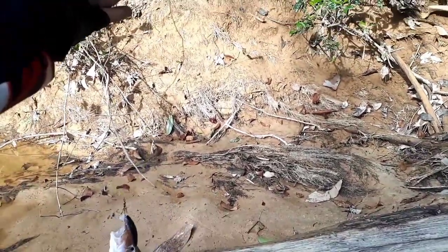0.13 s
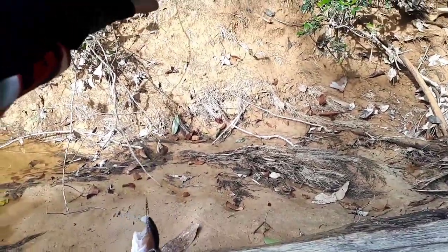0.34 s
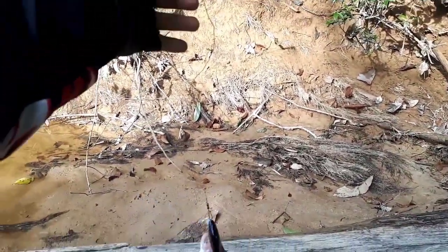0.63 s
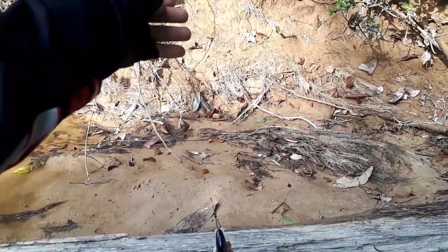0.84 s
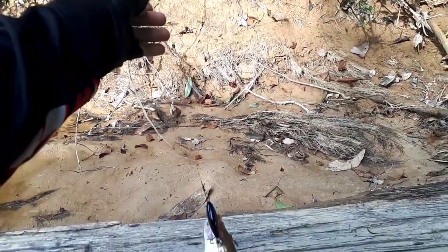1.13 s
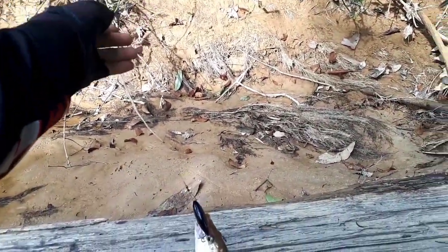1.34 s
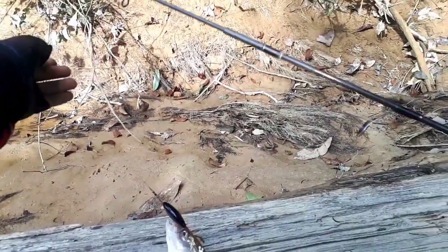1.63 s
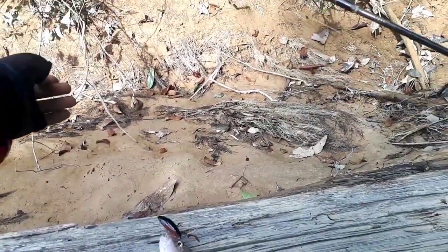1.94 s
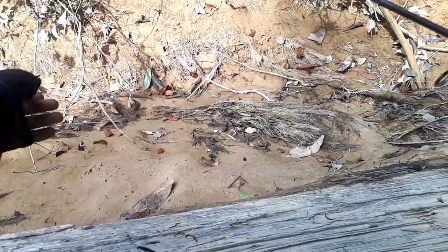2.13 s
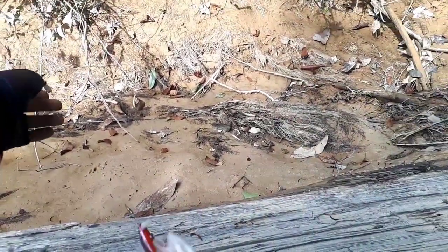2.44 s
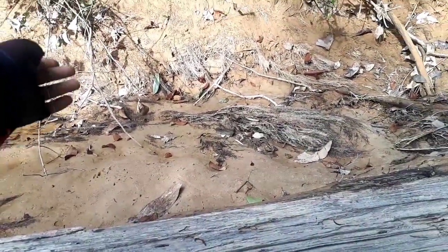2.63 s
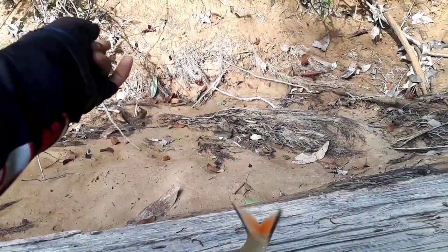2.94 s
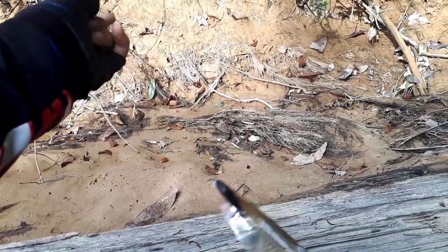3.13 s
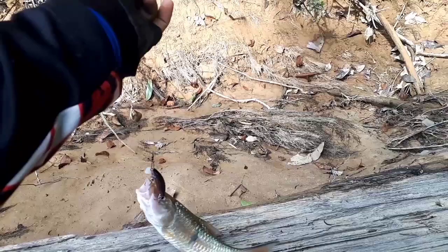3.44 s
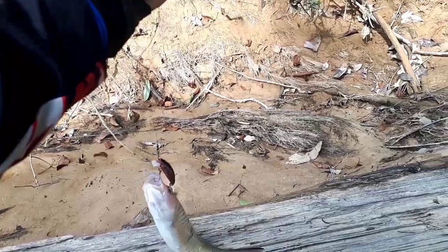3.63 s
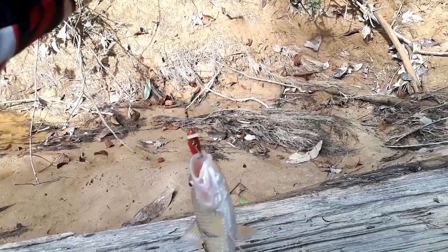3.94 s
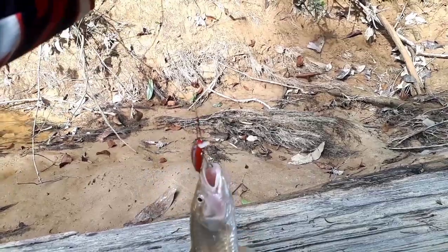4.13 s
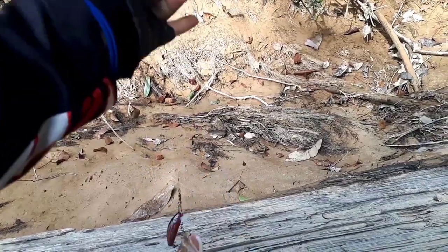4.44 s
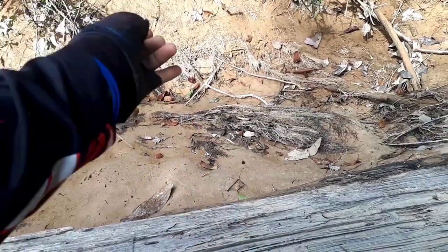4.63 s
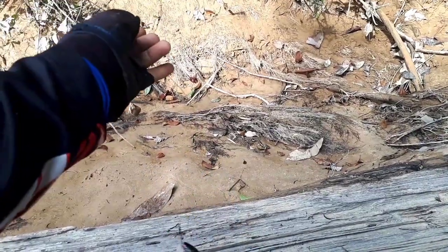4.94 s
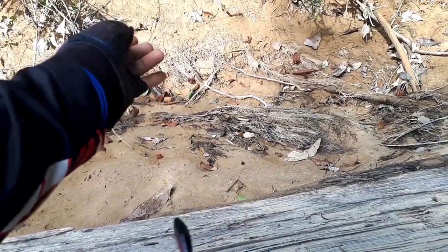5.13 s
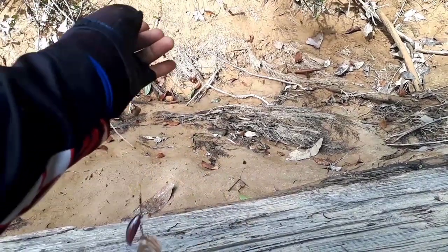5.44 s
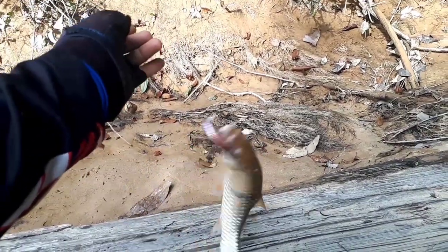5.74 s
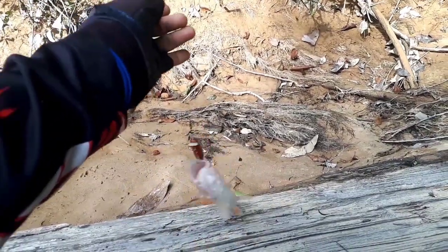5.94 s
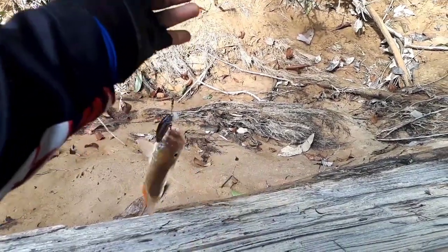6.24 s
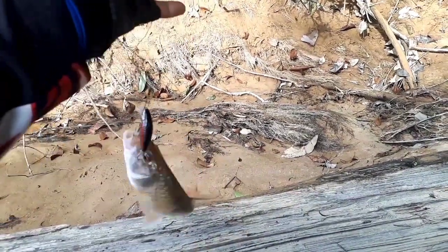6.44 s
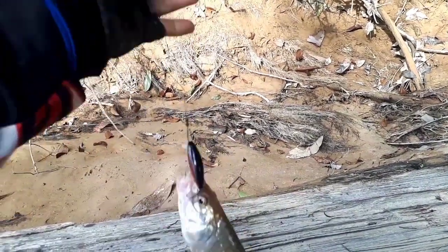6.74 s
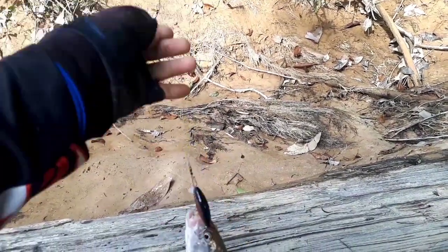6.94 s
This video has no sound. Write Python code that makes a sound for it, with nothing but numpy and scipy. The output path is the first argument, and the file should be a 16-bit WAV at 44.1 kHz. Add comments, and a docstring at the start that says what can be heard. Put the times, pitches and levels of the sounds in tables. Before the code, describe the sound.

Outdoors on a riverbank, a far cicada chorus holds a thin, high, slightly throbbing buzz over faint leaf and river hiss. At 0.1 s a tight group of wet smacks lands close, slightly right, followed by gritty rubbing. From 0.35 to 1.1 s soft low wind bumps hit the left side while twigs moan in airy, wavering tones. One crisp slap comes at 2.0, then juddering rubs, lure ticks and strong wind thumps from 2.25. A dense flurry at 2.45-2.57 mixes wet slaps, bright hook rattle and hollow log knocks; a sharp smack follows at 3.0 and clicking hits at 3.4. Wind bumps again near 3.8. Flurries return at 4.7 and, with heavier wood thuds, at 5.15-5.3. A last run spans 5.65-5.8, one weak slap and tick fall at 6.0, then faint rustling, a lone tick at 6.85 and a barely audible final wind bump at 7.0.

```python
"""A hooked fish thrashes on a dry log by a river, close by, while cicadas, leaves and river hiss in noise bands.
The first slaps come at 0.1 s: noise bursts ring as wet smack, hook tick and log thud, with rasping grains.
Gusts then thump the left port with low noise bumps, and twigs moan in broad bands and wavering tones.
Slap flurries follow near 2.5, 3.4, 4.7 and 5.2 s, with drops, lone lure rattles and juddering rubs between.
A last flurry near 5.7 s thins to one slap at 6 s, then a rustle, a lone tick and a faint final eddy at 7 s."""
import sys
import numpy as np
from scipy import signal
from scipy.io import wavfile
from scipy.ndimage import uniform_filter1d

SR = 44100
rng = np.random.default_rng(int(sys.argv[2]) if len(sys.argv) > 2 else 0)


def persist_wave(psi):
    """Save psi, clipped to +-1, as 16-bit WAV."""
    counts = np.round(np.clip(psi, -1, 1) * 32767).astype(np.int16)
    wavfile.write(sys.argv[1], SR, np.atleast_2d(counts).T)


N = 311787
T = np.arange(N) / SR
# Source levels hold before panning and before the final low and high cuts; stereo rows are left, right.


def amp(db):
    """Level in dB to linear gain."""
    return 10 ** (np.asarray(db) / 20)


def rms(x):
    """Root-mean-square level over all samples and ports."""
    return np.sqrt(np.mean(x ** 2))


def unit(x):
    """Scale to an RMS of 1."""
    return x / rms(x)


def pan(db):
    """Port gains whose left-to-right difference is db; negative leans right."""
    return amp(np.array([[db], [-db]]) / 2)


def band(x, hz, width_hz):
    """Two-pole resonance, gain 1 at the centre."""
    b, a = signal.iirpeak(min(hz, .45 * SR), hz / width_hz, fs=SR)
    return signal.lfilter(b, a, x)


def double_band(x, hz, width_hz):
    """The same resonance twice, for steeper skirts."""
    return band(band(x, hz, width_hz), hz, width_hz)


def rings(x, modes, twice=False):
    """Sum of resonances, each at its own level; a second, wider pass darkens the valleys."""
    out = 0
    for hz, width_hz, db in modes:
        mode = band(x, hz, width_hz)
        if twice:
            mode = band(mode, hz, 2 * width_hz)
        out = out + amp(db) * unit(mode)
    return out


def curve(rows, column):
    """One column of a table, interpolated to a value per sample."""
    rows = np.array(rows)
    return np.interp(T, rows[:, 0], rows[:, column])


def walk(rate):
    """Random levels held 1 / rate s and slewed twice, with an RMS of 1."""
    hold = int(SR / rate)
    steps = np.repeat(rng.standard_normal(N // hold + 1), hold)
    return unit(uniform_filter1d(uniform_filter1d(steps, hold), hold)[:N])


def pair(length, likeness):
    """White noise at two ports with the given correlation."""
    c = np.clip(likeness, 0, 1)
    mid, side = rng.standard_normal((2, length))
    return np.sqrt((1 + c) / 2) * mid + np.sqrt((1 - c) / 2) * side * np.array([[1], [-1]])


def trail(rows, decay_s):
    """Envelope of (time [s], level [dB]) events: powers add, each amplitude falls to 1/e in decay_s."""
    power = np.zeros(N)
    for s, db in rows:
        power[int(s * SR)] += amp(2 * db)
    return np.sqrt(signal.lfilter([1], [1, -np.exp(-2 / (decay_s * SR))], power))


SLAP_SAMPLES = 2048
MAX_LEFT_LEAD = 6  # samples the left port may hear a contact first; each contact lies at its own angle
SLAP_PAN_DB, THUD_PAN_DB = -2.5, -4
THUD_LAG_S = 0.003053  # the log answers a little after the smack
TICK_MS, TICK_HZ = 2.2, 7300  # contact time scale and smack pitch of a lone rattle
TICK_BODY_DB, TICK_LOG_DB = -10.5, -38.5  # its smack and thud, against its tick
# Slaps on the log: (time [s], smack level [dB], smack pitch [Hz], log thud level [dB],
# lure tick level [dB], contact time scale [ms])
SLAPS = [(0.1151, -34, 3230, -60, -45, 4.2), (0.1204, -38.5, 1180, -70, -49, 2.7),
         (0.1232, -30.5, 3640, -62, -35, 1.6), (0.1236, -38, 1070, -65, -58, 1.12),
         (0.164, -48.5, 2200, -77, -69, 4.6), (0.221, -54, 2600, -84, -58, 8.6),
         (2.0102, -35.5, 5200, -57, -33.5, 1.5), (2.452, -38, 3930, -50, -45, 3.4),
         (2.4613, -32.5, 4800, -56, -30.5, 2.9), (2.468, -35.5, 940, -43, -34, 2.44),
         (2.473, -30.5, 2600, -37.5, -26, 1.23), (2.4815, -24.5, 4900, -38.5, -30, 3.56),
         (2.4894, -41, 2440, -45, -29, 3.2), (2.499, -34.5, 3030, -46, -36.5, 2.6),
         (2.5304, -38, 4770, -62, -43, 1.4), (2.5348, -45, 3800, -61, -50, 1.5),
         (2.547, -49, 4000, -54, -56, 2.7), (2.5686, -38.5, 3880, -53.5, -58, 3.1),
         (2.989, -24, 4400, -40, -28.5, 2.18), (2.9914, -33.5, 1540, -63, -48, 1.17),
         (2.995, -46.5, 690, -63, -60, 10.6), (3.03, -60, 3700, -68, -69, 12),
         (3.4, -38, 4020, -61, -46, 1.7), (3.407, -57, 1550, -48, -50, 5.1),
         (3.4102, -29.5, 4000, -52, -24.5, 1), (3.4167, -48, 4000, -68, -43, 2.6),
         (4.6744, -48, 3720, -59, -51, 14.5), (4.6901, -33, 2110, -48, -30.5, 1.6),
         (4.6999, -36, 3930, -45, -41, 2.75), (4.706, -33, 2240, -48, -39, 4.8),
         (4.7159, -31.5, 4970, -53, -36, 2.15), (4.719, -29, 3350, -42, -27, 1.63),
         (4.7219, -41.5, 1870, -43, -30, 1.74), (5.141, -47.5, 4000, -47.5, -45, 4.8),
         (5.1495, -43.5, 1750, -41.5, -31, 1.64), (5.155, -36, 5070, -35, -33, 3.2),
         (5.187, -36, 730, -45, -38, 1.65), (5.19, -36, 2780, -43.5, -32, 1.35),
         (5.1988, -40, 4600, -45, -36, 3.4), (5.212, -48.5, 696, -51, -50, 3),
         (5.2882, -46.5, 1090, -52.5, -54, 3.04), (5.455, -62.5, 2570, -62, -51, 1.95),
         (5.6518, -47, 1490, -60, -38.5, 2), (5.656, -43.5, 4000, -68, -52, 3.6),
         (5.665, -45, 1180, -45, -57, 3.2), (5.6709, -39, 2540, -46, -37, 0.79),
         (5.68, -40.5, 4500, -51, -48, 2.4), (5.692, -43, 1180, -69, -47, 6.4),
         (5.7019, -34.5, 4660, -61, -38, 1.9), (5.7024, -40.5, 1600, -36, -46, 2.5),
         (5.7152, -36.5, 4670, -46, -44, 3), (5.7205, -32.5, 4550, -44, -31, 3),
         (5.7332, -36.5, 1760, -45, -42, 4.6), (5.7408, -38, 4970, -63, -42, 2.4),
         (5.798, -49, 1800, -78, -62, 4.6), (5.996, -56.5, 1830, -66, -52, 2.6)]
# The lure rattling alone: (time [s], tick level [dB])
LURE_RATTLES = [(2.2295, -55), (2.318, -50), (2.389, -47), (2.837, -46), (2.9738, -44), (3.1794, -45.5),
                (3.204, -42.5), (3.213, -37.5), (3.3958, -39), (3.4943, -38), (4.193, -54), (4.6697, -45.5),
                (4.829, -44), (4.9877, -47.5), (5.274, -45), (5.2794, -41.5), (6.013, -47.5), (6.8506, -52)]


def flapping():
    """Every contact is a ragged burst that excites the lure body, its hooks and the log."""
    out = np.zeros((2, N + 4096))
    rattles = [(s, db + TICK_BODY_DB, TICK_HZ, db + TICK_LOG_DB, db, TICK_MS) for s, db in LURE_RATTLES]
    for s, smack_db, hz, thud_db, tick_db, ms in SLAPS + rattles:
        contact_s = ms / 1000
        held = int(contact_s * SR) + 40  # samples over which levels are set
        push = contact_push(contact_s)
        force = pair(SLAP_SAMPLES, np.exp(-hz / LIKE_HZ)) * push
        smack = wet_smack(force, hz)
        tick = hook_tick(push)
        thud = log_thud(force, smack_db - thud_db)
        bright = amp(smack_db) * smack / rms(smack[:, :held]) + amp(tick_db) * tick / rms(tick[:, :held])
        bright[1] = np.roll(bright[1], rng.integers(2, MAX_LEFT_LEAD + 1))
        low = amp(thud_db) * thud / rms(thud[:held + 80])
        low = np.roll(low, int(THUD_LAG_S * SR))
        i = int((s - 0.27 * contact_s) * SR)
        out[:, i:i + SLAP_SAMPLES] += bright * pan(SLAP_PAN_DB) + low * pan(THUD_PAN_DB)
    return (out + scatter(out))[:, :N]


def contact_push(contact_s):
    """Force of one contact: it builds up, chatters in random steps and lets go."""
    x = np.arange(SLAP_SAMPLES) / SR / (0.73 * contact_s)
    chatter_db = 4.5 * np.repeat(rng.standard_normal(SLAP_SAMPLES // 16), 16)
    return x * np.exp(-x ** 1.042) * amp(chatter_db)


LIKE_HZ = 1900  # the two ports agree for smack pitches well below this
SMACK_Q = 0.66
RING_Q, RING_DB = 5, 2  # the struck spot also rings at the smack pitch; level against the smack
# Hollow lure body: (resonance [Hz], width [Hz], level [dB])
LURE_BODY = [(1040, 55, 9), (1960, 860, 5.5), (4100, 400, -2), (4880, 6200, 7.5)]


def wet_smack(force, hz):
    """Direct force and hollow lure body through one broad band, plus a narrower ring of the struck spot."""
    smack = band(force + rings(force, LURE_BODY) * force.std(), hz, hz / SMACK_Q)
    ring = band(force + force[::-1] / 2, hz, hz / RING_Q)  # half of the other port leaks in
    return smack / smack.std() + amp(RING_DB) * ring / ring.std()


# Rings and hooks of the lure: (resonance [Hz], width [Hz], level [dB])
HOOK_MODES = [(8190, 900, 11.5), (9100, 110, 0.5), (11930, 4800, 15), (16500, 5400, 18.5)]


def hook_tick(push):
    """The push rattles rings and hooks, nearly independent at the two ports."""
    return rings(pair(SLAP_SAMPLES, 0.02) * push, HOOK_MODES, twice=True)


THUD_HZ, THUD_OCTAVE_DB = 415, 9  # band centre at equal levels; smack excess that raises it an octave
# Wooden log: (resonance [Hz], width [Hz], level [dB])
LOG_MODES = [(161, 120, 18), (346, 350, 15), (590, 450, 9.5), (905, 290, 5)]


def log_thud(force, smack_over_thud_db):
    """Log resonances; the heavier the thud against the smack, the deeper it sounds."""
    hz = THUD_HZ * 2 ** np.clip(smack_over_thud_db / THUD_OCTAVE_DB, -.5, 1)
    return band(rings(force.sum(0), LOG_MODES, twice=True), hz, 1.07 * hz)


SCATTER_T60_S, SCATTER_DB, SCATTER_HZ = .1, -17, 2200


def scatter(dry_slaps):
    """Sand and brush return a short, dull, diffuse tail."""
    t = np.arange(SR // 4) / SR
    tail = pair(len(t), 0.53) * np.exp(-np.log(1000) * t / SCATTER_T60_S)
    tail *= np.minimum(t / 0.0018, 1)  # soft start
    tail = band(tail, SCATTER_HZ, 2 * SCATTER_HZ)
    tail /= np.sqrt(np.sum(tail ** 2) / 2)
    return amp(SCATTER_DB) * signal.fftconvolve(dry_slaps, tail, axes=1)[:, :dry_slaps.shape[1]]


def grains(db, size):
    """Gain steps of uneven height, each held for size samples."""
    heights = np.minimum(rng.exponential(size=N // size + 1), 4)
    return amp(db * np.repeat(heights, size)[:N])


# Tone of wet skin and cloth: (resonance [Hz], width [Hz], level [dB])
SKIN_TONE = [(664, 370, 3.5), (1670, 530, -1.5), (2970, 790, -0.5), (4720, 4500, 5)]


def rasp(db, size):
    """Dense stick-slip grains, drawn anew for each resonance of skin and cloth."""
    return unit(sum(rings(pair(N, 0.024) * grains(db, size), [tone]) for tone in SKIN_TONE))


SPRAY_HZ, SPRAY_WIDTH_HZ = 12500, 13000


def rustle():
    """Slap spatter, dragging skin and cloth, and juddering rubs, with one fine spray of treble grains."""
    spray = unit(double_band(pair(N, 0.034) * grains(3.1, size=64), SPRAY_HZ, SPRAY_WIDTH_HZ))
    return (spatter(spray) + drags(spray) + rubs()) * pan(-3.0)


SPATTER_DB, SPATTER_S = -21.5, 0.048  # level against the smack for a 1 ms contact; decay time
SPATTER_SPRAY_DB = -10  # spray against rasp
DROP_SCATTER_DB = 4  # a few drops are much larger than the rest


def spatter(spray):
    """Drops thrown by each slap: grains that die away, with more power after longer contacts."""
    events = [(hit[0], hit[1] + SPATTER_DB + 10 * np.log10(hit[-1])) for hit in SLAPS]
    drops = rasp(DROP_SCATTER_DB, size=96) + amp(SPATTER_SPRAY_DB) * spray
    return trail(events, SPATTER_S) * drops


# Skin and cloth dragging: (time [s], rasp level [dB], length scale [ms], spray level [dB])
DRAGS = [(0.078, -52, 47, -68), (0.261, -59, 69, -71), (0.33, -60.5, 52, -76), (0.603, -64, 130, -64),
         (0.7, -62, 150, -66), (0.774, -55, 110, -62), (0.86, -58.5, 155, -68), (1.1, -65.5, 670, -87),
         (2.254, -46.5, 68, -49), (2.321, -52.5, 25, -66), (2.393, -49.5, 113, -54.5),
         (2.972, -51, 33, -57), (3.212, -60.5, 170, -58.5), (4.23, -64.5, 150, -71), (4.78, -58, 77, -75),
         (4.96, -71, 110, -58), (5.113, -51.5, 20, -60), (5.174, -43, 69, -46.5), (5.286, -56.5, 210, -61),
         (5.61, -67, 50, -54.5), (5.79, -55.5, 215, -63), (6.135, -62, 99, -56.5), (6.61, -69.5, 84, -60)]


def drags(spray):
    """Each drag of rasp and spray starts quickly and dies away slowly."""
    out = np.zeros((2, N))
    skin = rasp(2.74, size=96)
    for s, rasp_db, ms, spray_db in DRAGS:
        on = slice(max(int((s - ms / 1000) * SR), 0), int((s + ms / 400) * SR))
        x = (T[on] - s) / (0.5 * ms / 1000)
        shape = np.exp(-np.abs(x) ** np.where(x < 0, 3, 1.3))
        out[:, on] += shape * (amp(rasp_db) * skin[:, on] + amp(spray_db) * spray[:, on])
    return out


RUB_Q, RUB_SLIPS_PER_S = 8.7, 170  # resonance sharpness; slip rate before its random wander
# Rubbed spots: (start time [s], length [ms], pitch [Hz], level [dB])
RUB_SPOTS = [(0.162, 29, 2200, -63), (0.252, 23, 2220, -58.5), (0.55, 110, 2180, -67.5),
             (0.73, 170, 2140, -64.5), (2.223, 74, 2190, -53.5), (2.316, 8.8, 2260, -55),
             (2.359, 58, 2320, -55), (4.729, 24, 4060, -55), (5.811, 17, 1870, -60),
             (6.11, 50, 4700, -67.5)]


def rubs():
    """A rubbed spot sticks and slips unevenly, each slip exciting a resonance of its own."""
    out, size = np.zeros((2, N)), 8192
    for s, ms, hz, db in RUB_SPOTS:
        rate = RUB_SLIPS_PER_S * amp(50 * uniform_filter1d(rng.standard_normal(size), 256))
        slip_phase = np.cumsum(rate) / SR % 1
        stroke = np.sin(np.pi * np.minimum(T[:size] * 1000 / ms, 1)) ** .5
        drag = pair(size, 0.7) * (0.3 + np.exp(-slip_phase / 0.3)) * stroke
        rub = band(band(drag, hz, hz / RUB_Q), hz, 2 * hz / RUB_Q)
        i = int(s * SR)
        out[:, i:i + size] += amp(db) * rub / np.sqrt(np.sum(rub ** 2) / (2 * ms / 1000 * SR))
    return out


RUMBLE_HZ, RUMBLE_WIDTH_HZ = 91.6, 103
WAKE_DB, WAKE_S = -19.5, 0.061  # rumble trailing each eddy: level against it, decay time
# Rumble at the left and right port before it wanders: (level [dB])
RUMBLE_LEVELS = [
    [-67],
    [-66],
]


def wind():
    """A wandering faint rumble at both ports; eddies and their wakes strike the exposed left one."""
    rumble = band(rng.standard_normal((2, N)), RUMBLE_HZ, RUMBLE_WIDTH_HZ)
    rumble = band(rumble, RUMBLE_HZ, 0.86 * RUMBLE_WIDTH_HZ)
    wander_db = 3.95 * np.array([walk(3.97), walk(2.88)])
    out = unit(rumble) * amp(np.array(RUMBLE_LEVELS) + wander_db)
    wake = trail([(s, db + WAKE_DB) for s, db, ms in EDDIES], WAKE_S)
    out[0] += unit(rumble[0]) * wake + eddies()
    return out


EDDY_HZ, EDDY_HZ_PER_DB = 114, 5.5  # filter reference at -42 dB; stronger eddies are higher
# Strong eddies at the left port: (time [s], level [dB], length scale [ms])
EDDIES = [(0.358, -47, 17), (0.432, -37.5, 13.6), (0.536, -43.5, 54), (0.936, -40, 10.4),
          (0.983, -39.5, 11), (1.027, -37, 13), (1.055, -38.5, 10.4), (2.266, -49.5, 24),
          (2.33, -30.5, 9.2), (2.361, -34.5, 10.5), (2.515, -32.5, 12), (2.555, -35, 14),
          (2.586, -36.5, 9.7), (2.659, -41.5, 15), (2.742, -46.5, 13.5), (3.811, -38, 10.3),
          (3.845, -35.5, 12), (3.938, -42.5, 14), (5.445, -41, 6.4), (5.535, -39, 12), (7.019, -54.5, 11)]


def eddies():
    """Each eddy is a rounded bump of low noise, its filters set at fractions of one reference pitch."""
    out, reach = np.zeros(N), 4096
    t = np.arange(-reach, reach) / SR
    for s, db, ms in EDDIES:
        hz = EDDY_HZ + EDDY_HZ_PER_DB * (db + 42.0)
        shape = np.exp(-(t / (1.24 * ms / 1000)) ** 2)
        eddy = band(rng.standard_normal(2 * reach), hz, 0.43 * hz)
        eddy = band(eddy, 0.31 * hz, 0.3 * hz) * shape
        eddy = band(eddy, 0.55 * hz, 2.9 * hz)
        eddy *= amp(db) * np.sqrt(np.sum(shape ** 2) / np.sum(eddy ** 2))
        i = int(s * SR) - reach
        out[i:i + 2 * reach] += eddy[:N - i]
    return out


MOAN_LIKENESS, MOAN_PAN_DB = .7, -5.5  # correlation of the ports; pan
# Wind in the branches: (time [s], low moan level [dB], high moan level [dB])
MOAN_LEVELS = [(0.0, -93, -59.5), (0.35, -68.5, -67), (0.57, -64, -62.5), (0.81, -62, -58), (1.0, -63, -62),
               (1.14, -77, -66), (1.3, -63.5, -62.5), (1.52, -60.5, -66.5), (1.72, -80, -72),
               (1.92, -70.5, -70.5), (2.42, -62, -60.5), (2.64, -91, -79.5), (2.95, -100, -65),
               (3.13, -69, -77), (3.27, -58, -63.5), (3.37, -63.5, -68), (3.48, -84, -75), (4.67, -73, -76),
               (4.84, -60.5, -73.5), (5.04, -69.5, -75.5), (5.4, -79, -71.5), (6.17, -93, -75.5),
               (6.3, -64, -70.5), (6.52, -67.5, -74), (6.64, -69.5, -78), (6.76, -82, -77.5),
               (7.07, -72.5, -73.5)]
# Low and high moan bands: (centre [Hz], width [Hz], level [dB])
LOW_BANDS = [(345, 170, 2.5), (498, 135, -5)]
HIGH_BANDS = [(651, 280, 10.4), (918, 75, 5.3)]


def moan():
    """Wind over twigs hums in two sets of broad bands that swell and fade, joined by whistles."""
    out = whistles()
    for column, modes in enumerate((LOW_BANDS, HIGH_BANDS), start=1):
        hum = unit(rings(pair(N, MOAN_LIKENESS), modes, twice=True))
        out += hum * amp(curve(MOAN_LEVELS, column))
    return out * pan(MOAN_PAN_DB)


WHISTLE_WIDTH_HZ = 95  # sets the smoothing of the noise that makes the tone waver
# Wavering tones: (middle time [s], length [s], pitch [Hz], level [dB], glide [Hz per s])
TWIG_TONES = [(0.22, 0.41, 770, -61.5, -300), (0.678, 0.18, 318, -55.5, 31), (0.722, 0.28, 563, -58, -48),
              (0.882, 0.14, 765, -54.5, -63), (1.197, 0.36, 970, -65.5, -200),
              (1.45, 0.29, 480, -65.5, -200), (1.845, 0.22, 775, -59, -300), (2.103, 0.43, 600, -63, -200),
              (3.154, 0.17, 336, -59.5, 244), (3.315, 0.19, 315, -68, -120),
              (4.883, 0.14, 387, -63.5, -200), (4.958, 0.11, 316, -58, -57), (6.441, 0.39, 341, -66, -70.5)]


def whistles():
    """A twig sheds eddies evenly enough for a gliding tone, wavering on slow noise."""
    out, smooth = np.zeros((2, N)), SR // WHISTLE_WIDTH_HZ
    for s, length_s, hz, db, glide in TWIG_TONES:
        on = slice(max(int((s - length_s) * SR), 0), int((s + length_s) * SR))
        x = (T[on] - s) / (length_s / 2)
        phase = 2 * np.pi * np.cumsum(hz + glide * (T[on] - s)) / SR
        a, b = (uniform_filter1d(uniform_filter1d(pair(len(x), MOAN_LIKENESS), smooth), smooth // 2)
                for _ in range(2))
        tone = unit(a * np.cos(phase) + b * np.sin(phase))
        out[:, on] += amp(db) * np.exp(-x ** 2) * tone
    return out


CICADA_DB, CICADA_PAN_DB = -56.5, -4
# Body resonance and overtone of the chorus: (low edge [Hz], high edge [Hz], relative level [dB])
CICADA_BANDS = [(6600, 7350, 0), (7350, 8400, -4), (13400, 15600, -4.5), (11400, 12500, -17)]


def cicadas():
    """A far chorus: tymbal clicks blurred to noise in the body bands, throbbing a little."""
    chorus = 0
    for low_hz, high_hz, db in CICADA_BANDS:
        body = signal.butter(3, [low_hz, high_hz], "band", fs=SR, output="sos")
        gain = amp(db + 0.5 * walk(2.47) + 1.24 * walk(90))  # slow drift and fast throb
        chorus = chorus + gain * unit(signal.sosfilt(body, pair(N, 0)))
    return unit(chorus) * amp(CICADA_DB) * pan(CICADA_PAN_DB)


AIR_DB, AIR_PAN_DB = -67, -4
# Colour of the hiss: (frequency [Hz], relative level per Hz [dB])
AIR_COLOUR = [(200, -11), (400, -5.5), (900, 8.5), (1300, -7), (2200, 3), (4500, -4.5), (6000, -3),
              (10000, -2), (16000, -26)]


def air():
    """Leaves and river far away: soft hiss in third-octave-spaced bands that flicker and drift."""
    hz, db = np.transpose(AIR_COLOUR)
    out = 0
    for f in 220 * 2 ** np.arange(0, 6.3, 1 / 3):
        colour_db = np.interp(np.log(f), np.log(hz), db)
        gain = amp(colour_db + 1.2 * walk(14) + 1.8 * walk(1.5))
        out = out + gain * double_band(pair(N, 0), f, f / 3)
    return unit(out) * amp(AIR_DB) * pan(AIR_PAN_DB)


def scene():
    """Thrashing fish in front, wind around it, cicadas and air far behind."""
    return flapping() + rustle() + wind() + moan() + cicadas() + air()


TOP_HZ = 15600


def record(dry):
    """Roll-off below 40 Hz and a steep one above 15.6 kHz."""
    low_cut = signal.butter(2, 40, "high", fs=SR, output="sos")
    top_cut = signal.cheby1(12, .5, TOP_HZ, fs=SR, output="sos")
    return signal.sosfilt(np.vstack([low_cut, top_cut]), dry)


dry = scene()
out = record(dry)
persist_wave(out)
```